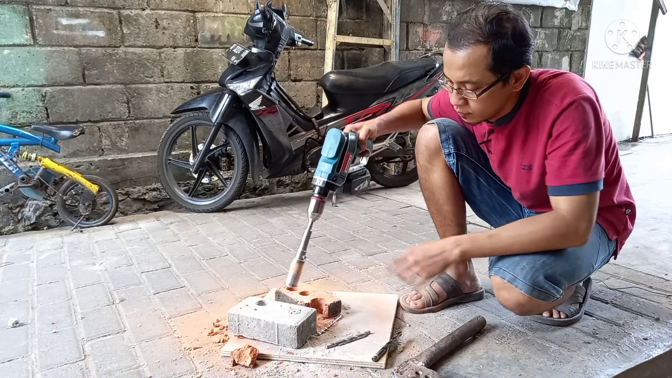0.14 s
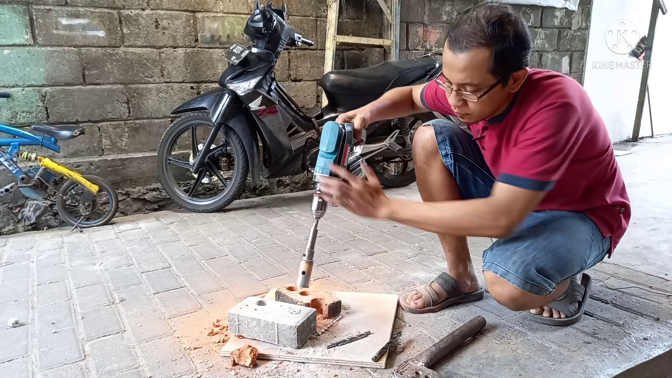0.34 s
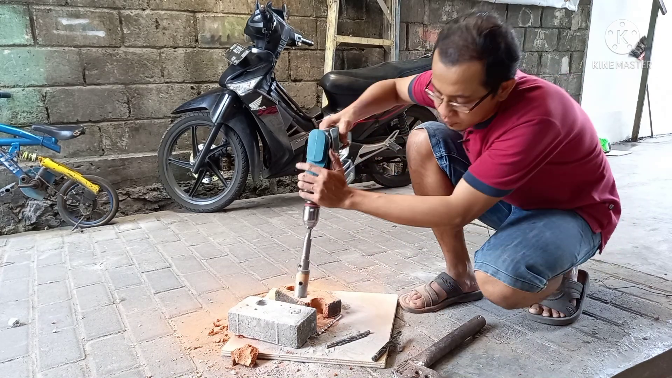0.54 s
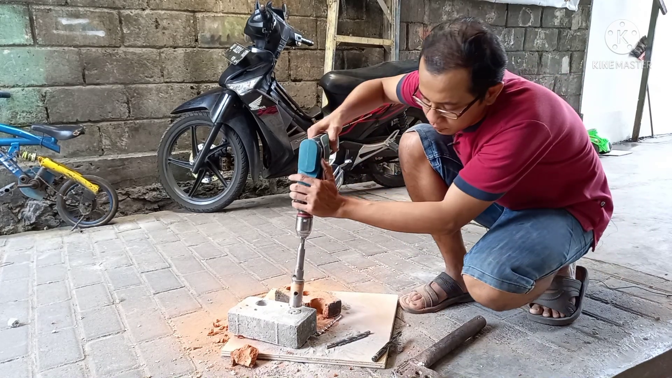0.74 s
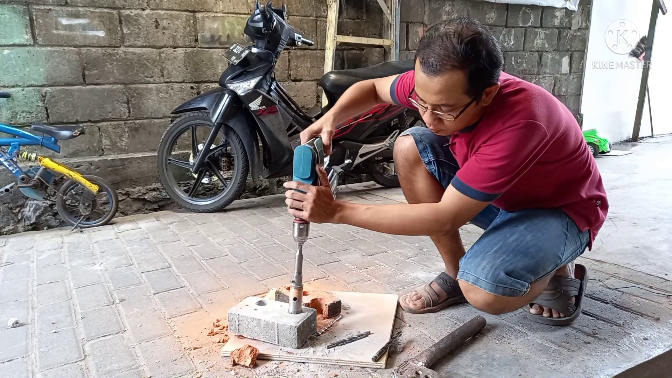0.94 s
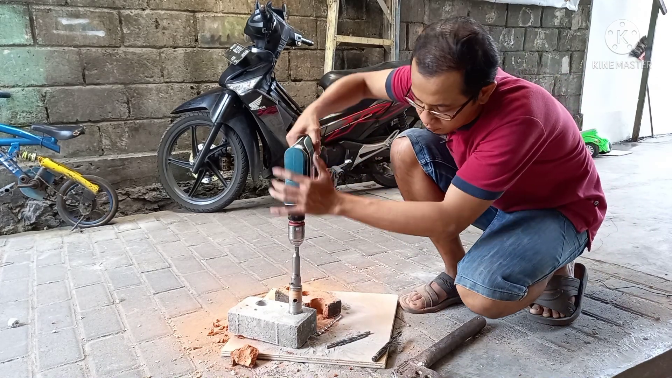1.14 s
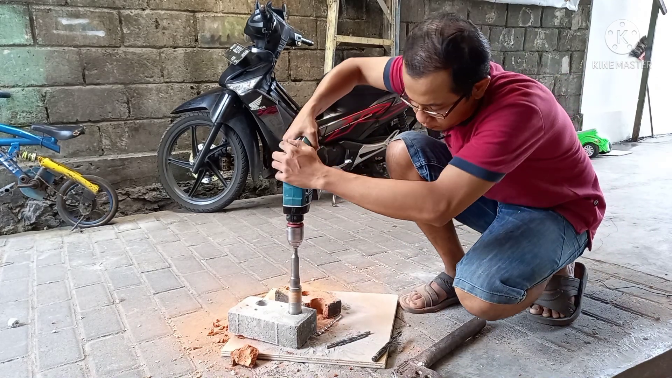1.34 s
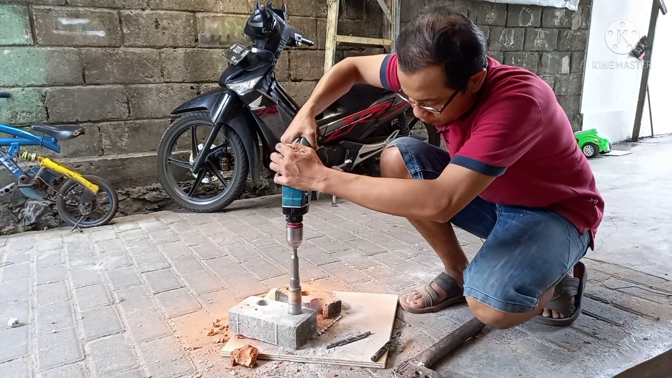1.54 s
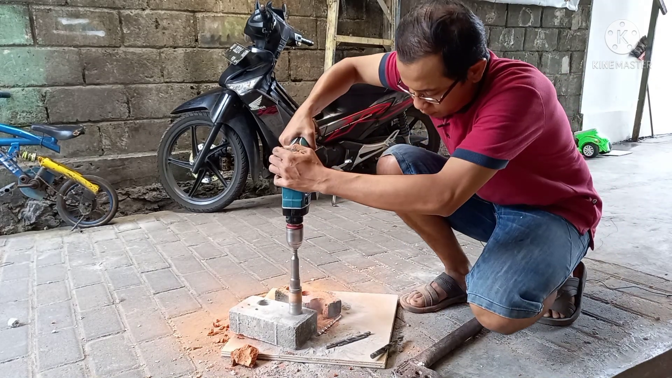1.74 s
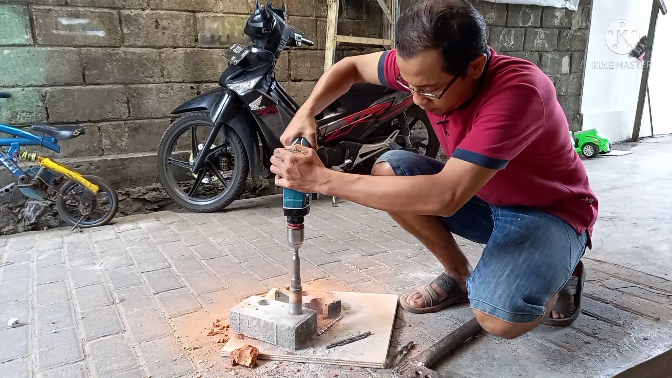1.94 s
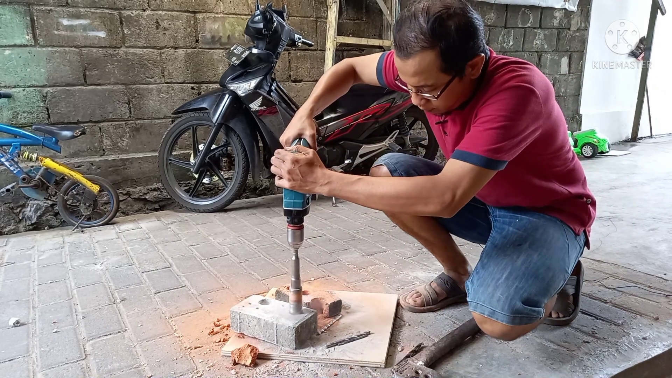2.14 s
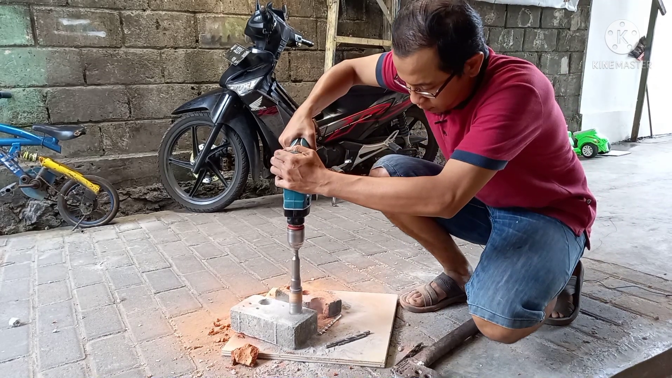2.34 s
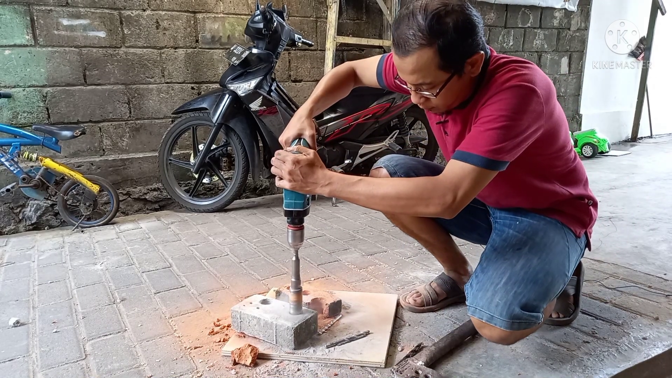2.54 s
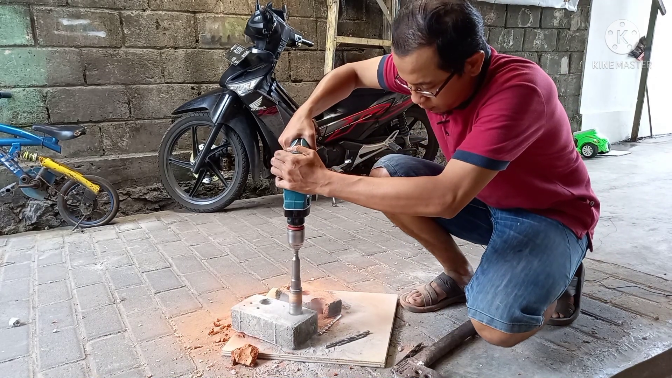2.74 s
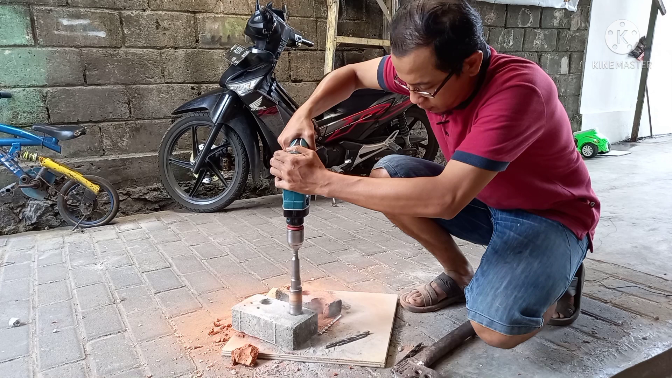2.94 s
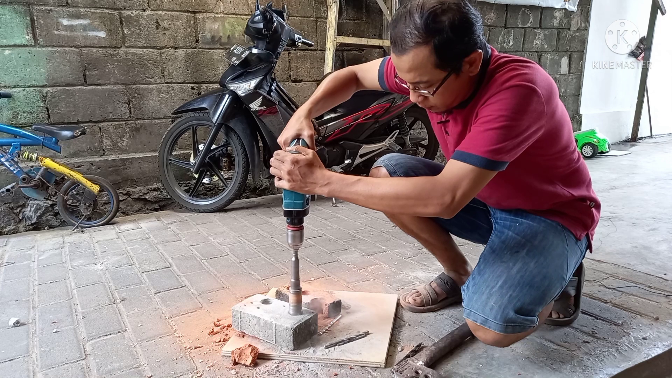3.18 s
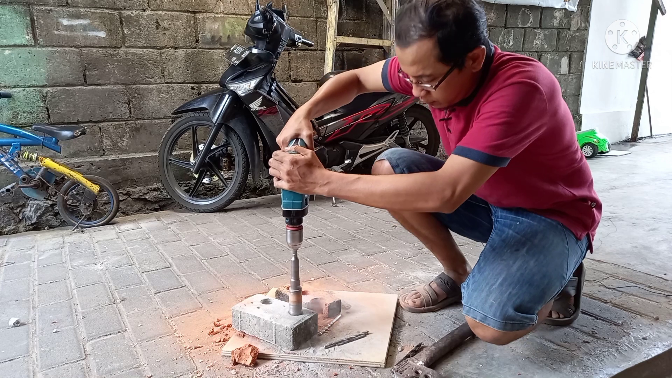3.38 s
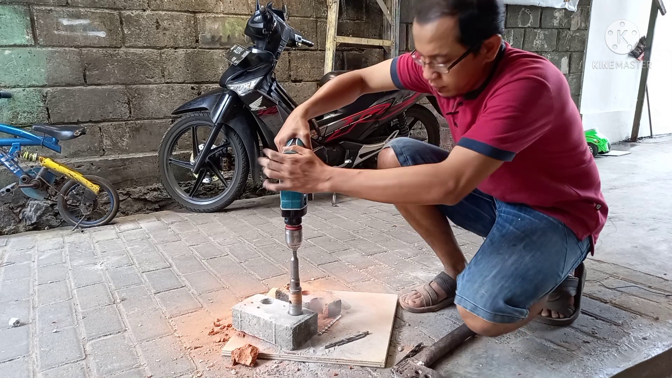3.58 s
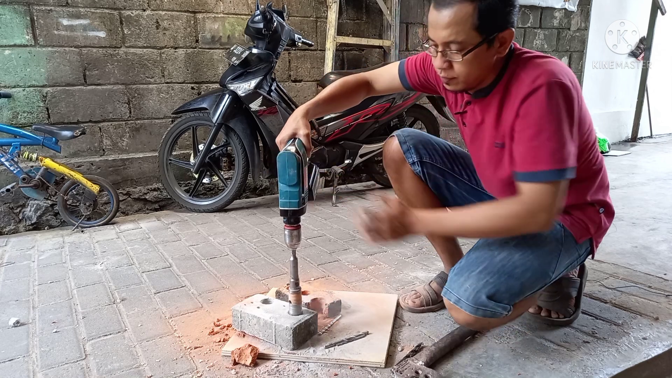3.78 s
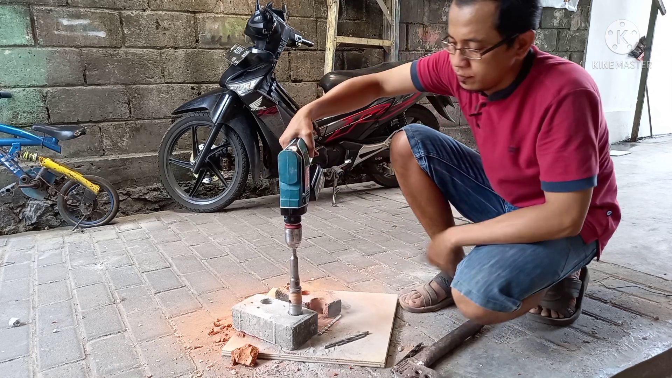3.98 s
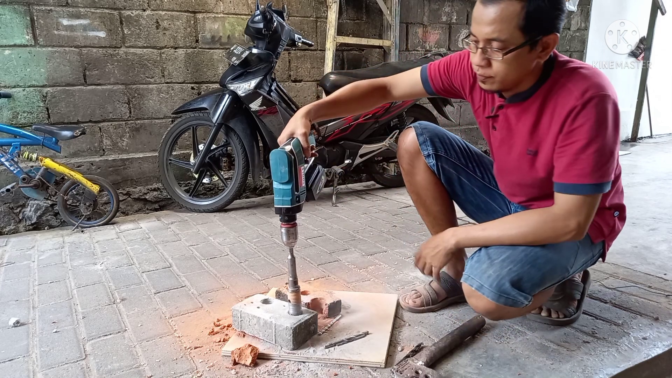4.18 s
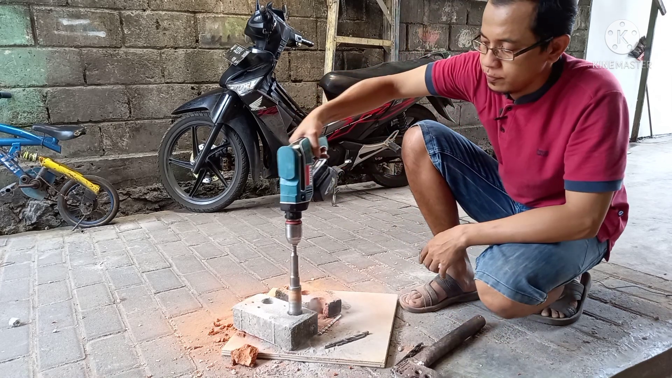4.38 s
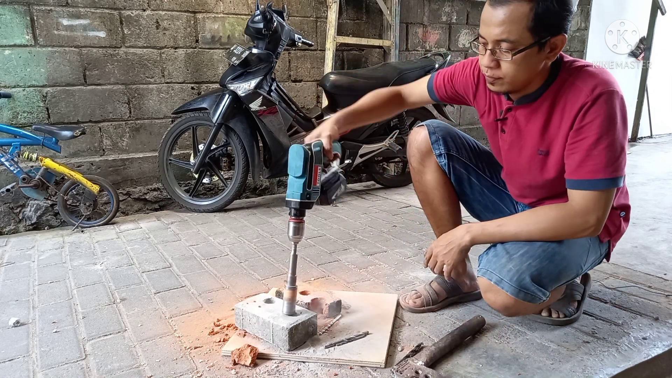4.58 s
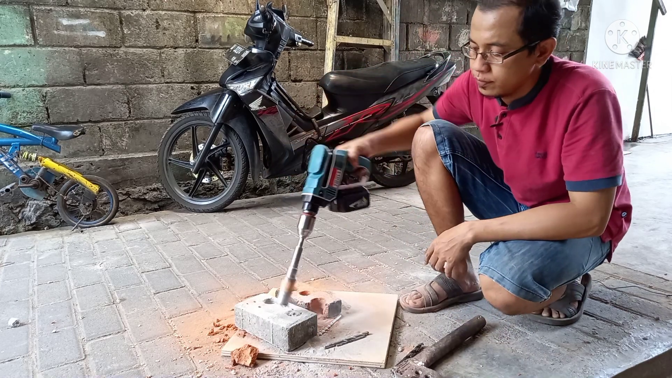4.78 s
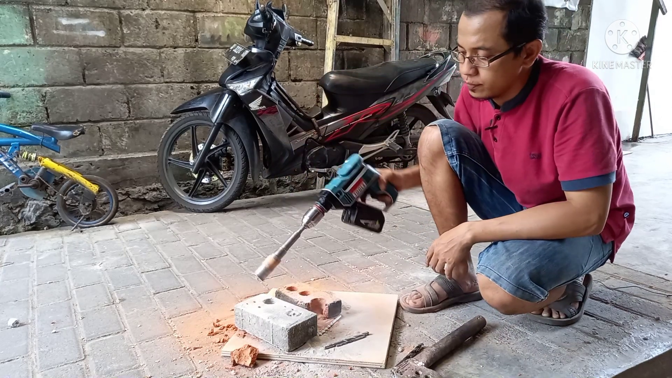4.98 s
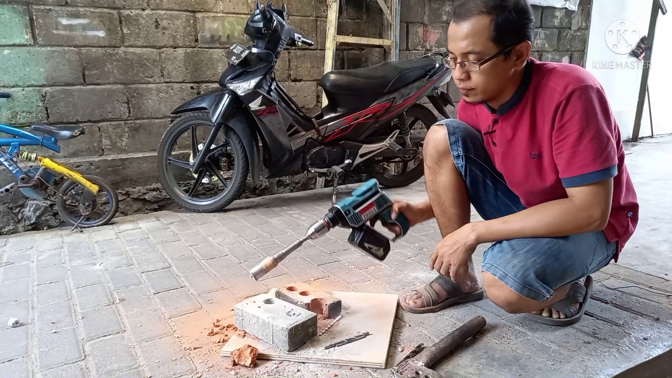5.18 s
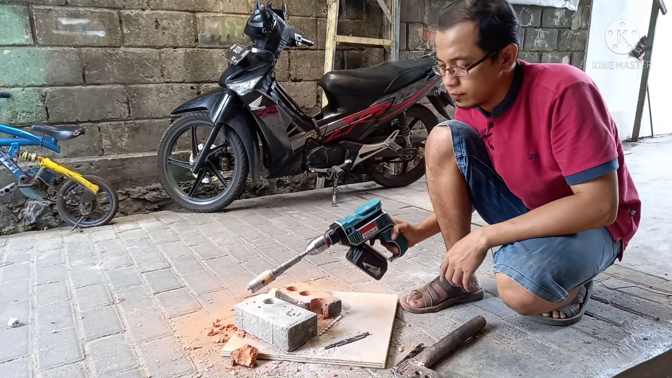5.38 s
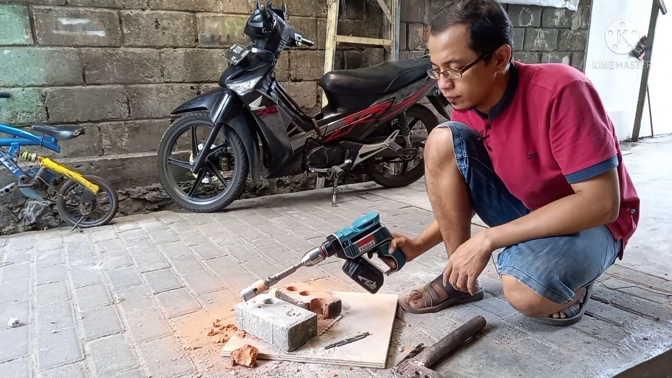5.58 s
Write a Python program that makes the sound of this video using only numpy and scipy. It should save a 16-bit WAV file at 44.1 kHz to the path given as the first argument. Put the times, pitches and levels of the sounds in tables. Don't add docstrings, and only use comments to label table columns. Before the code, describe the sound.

Close outdoor sound of a battery drill on concrete: a brief rattle and falling motor whir, quiet steel taps, hard clacks, then about two seconds of rough, rapid grinding with ringing steel and sharp squeaks at the start. The block's ring dies quickly, leaving near quiet. A short looser clatter then winds down with gear notes and airy hiss, over distant engine drone and light wall reflections.

```python
import sys
import numpy as np
from scipy import signal
from scipy.fft import rfft, irfft, next_fast_len
from scipy.io import wavfile
from scipy.ndimage import uniform_filter1d, map_coordinates

SR = 44100
rng = np.random.default_rng(int(sys.argv[2]) if len(sys.argv) > 2 else 0)


def int16_out(signal):
    q = np.round(np.clip(np.atleast_2d(signal).T, -1, 1) * 32767)
    wavfile.write(sys.argv[1], SR, q.astype(np.int16))


def volts_from_decibels(level):
    exponent = np.asarray(level, float) / 20
    return 10 ** exponent


N = 248106
TIME = np.arange(N) / SR


def unit(x):
    return x / np.sqrt(np.mean(x ** 2) + 1e-20)


def along(points, hz):
    f, v = np.transpose(points)
    return np.interp(np.log(hz + 1), np.log(f + 1), v, -120, -120)


def curves(rows, outside=None):
    s, *cols = np.transpose(rows)
    return [np.interp(TIME, s, c, outside, outside) for c in cols]


def wobble(rate_hz):
    coarse = np.arange(0, N + 8, 8)
    knots = rng.standard_normal(int(N * rate_hz / SR) + 4)
    smooth = map_coordinates(knots, [coarse * rate_hz / SR])
    return unit(np.interp(np.arange(N), coarse, smooth))


def filtered(x, response):
    m = next_fast_len(N + SR // 4)
    hz = np.fft.rfftfreq(m, 1 / SR)
    return unit(irfft(rfft(x, m) * response(hz), m)[:N])


def coloured(x, spectrum):
    return filtered(x, lambda hz: volts_from_decibels(along(spectrum, hz)))


def resonance(f, hz, width_hz):
    return 1j * f / (hz * hz - f * f + 1j * f * width_hz)


def ringing(x, modes):
    return sum(volts_from_decibels(db) * filtered(x, lambda f: resonance(f, hz, width)) for hz, width, db in modes)


def singing(x, hz, width_hz, db):
    return volts_from_decibels(db) * filtered(x, lambda f: resonance(f, hz, width_hz) ** 2)


def layers(spells, mix):
    force_db = np.max([curves(rows, outside=-120)[0] for rows in spells], axis=0)
    sharp_db = sum(curves(rows, outside=0)[1] for rows in spells)
    return [force_db] + [db + share * sharp_db for db, share in mix]


def grinding(chips, spectrum, edges_hz, levels_db):
    m = next_fast_len(N + SR // 4)
    hz = np.fft.rfftfreq(m, 1 / SR)
    steps = [1] + [1 / (1 + (edge / (hz + 1)) ** 16) for edge in edges_hz] + [0]
    whole = rfft(chips, m) * volts_from_decibels(along(spectrum, hz))
    thud, *upper = [unit(irfft(whole * (low - high), m)[:N]) for low, high in zip(steps, steps[1:])]
    return volts_from_decibels(levels_db[0]) * (thud + sum(volts_from_decibels(db) * part for db, part in zip(levels_db[1:], upper)))


def blips(rows, fall):
    out, u = np.zeros(N + SR), np.arange(-1200, 1200) / SR
    for (s, db, hz, ms), turn in zip(rows, rng.random(len(rows))):
        v = u / (ms / 1000)
        swell = volts_from_decibels(db) * np.exp(-2.8 * (v * np.where(v < 0, 1.7, .75)) ** 2)
        tone = np.cos(2 * np.pi * (hz * u * (1 - fall * v / 2) + turn))
        out[round(s * SR):][:len(u)] += swell * tone
    return out[len(u) // 2:][:N]


# time in seconds, firings per second.
ENGINE_FIRING = [(0, 43), (.5, 42.8), (1.2, 43), (5.63, 43)]
# multiple of the firing rate, level in dB re the drone.
ENGINE_HARMONICS = [(3, -5.5), (4, -10), (5, -14.5)]


def engine():
    phase = 2 * np.pi * np.cumsum(curves(ENGINE_FIRING)[0]) / SR
    hum_hz, hum_db = 150.4, -3
    total = volts_from_decibels(hum_db + 2.5 * wobble(6)) * np.sin(2 * np.pi * hum_hz * TIME + .5 * wobble(8))
    for k, db in ENGINE_HARMONICS:
        total = total + volts_from_decibels(db + 4 * wobble(7)) * np.sin(round(k) * phase + .5 * wobble(8))
    return total


# time in seconds, level in dB.
DRONE_LEVEL = [(0.0, -42), (0.1, -40), (0.27, -45), (0.77, -39), (1.49, -54), (1.71, -39.5), (1.91, -39),
               (2.73, -44), (3.51, -45), (3.89, -47), (4.07, -55.5), (4.54, -54.5), (4.78, -47),
               (5.12, -48.5), (5.63, -42)]
# time in seconds, level in dB.
WASH_LEVEL = [(0, -46.5), (.7, -52.5), (1.5, -53), (4, -63.5), (4.5, -66.5), (5, -66), (5.63, -48)]
# frequency in Hz, density in dB per Hz.
DRONE_COLOUR = [(90, -29), (122, -0.5), (143, -2), (165, 2), (210, -19), (260, -17), (320, -56)]
RUMBLE_COLOUR = [(20, -40.5), (45, -18), (72, -8.5), (100, -6.5), (130, -40.5)]
WASH_COLOUR = [(160, -18), (200, -0.5), (260, -1), (400, -8.5), (700, -14.5), (1100, -17), (1500, -33),
               (2000, -30.5), (2700, -35), (3100, -29), (3500, -36), (9000, -41), (15500, -63)]


def traffic():
    drone_db, = curves(DRONE_LEVEL)
    rumble_db = -53 + 0.98 * (drone_db - drone_db.mean())
    noise = rng.standard_normal((3, N))
    throb = volts_from_decibels(drone_db + 0.96 * wobble(12))
    drone = throb * (volts_from_decibels(-5) * coloured(noise[0], DRONE_COLOUR) + engine())
    rumble = volts_from_decibels(rumble_db) * coloured(noise[1], RUMBLE_COLOUR)
    wash = volts_from_decibels(curves(WASH_LEVEL)[0] + 1.5 * wobble(35)) * coloured(noise[2], WASH_COLOUR)
    return drone + rumble + wash


# frequency in Hz, t60 in seconds.
YARD_DECAY = [(200, .45), (2000, .4), (9000, .33), (15000, .15)]


def yard(x):
    hz, t, z = signal.stft(rng.standard_normal(SR // 2), SR, nperseg=256)
    t60 = np.interp(hz, *np.transpose(YARD_DECAY))
    tail = signal.istft(z * volts_from_decibels(-60 * t / t60[:, None]), SR, nperseg=256)[1]
    late = np.pad(x, (300, 0))
    return signal.fftconvolve(late, tail / np.linalg.norm(tail))[:N]


# time in seconds, peak in dB, thud in dB re the peak, click centre in Hz.
TAPS = [(0.014, -22, -0.5, 4540), (0.0484, -13.5, 12.5, 4880), (0.0776, -14.5, 5.5, 5460),
        (0.1384, -31, 8, 2495), (0.4316, -41.5, 8.5, 1500), (0.532, -51.5, 11, 1200),
        (0.5926, -46.5, -1, 2000), (0.7434, -50, -2.5, 5000), (1.154, -49.5, 18.5, 6980),
        (1.1722, -46.5, 17.5, 2000), (1.2064, -32, 23, 4390), (1.2251, -37, 15, 2990),
        (1.267, -28.5, -1.5, 1585), (1.2679, -34.5, -7, 2678), (1.271, -51.5, 4.5, 6520),
        (1.3443, -48.5, 7, 5030), (1.364, -46, 4, 2500), (1.4573, -52, 26, 5450), (1.557, -43.5, 8.5, 4000),
        (1.5901, -30, -2.5, 3000), (1.6057, -17.5, -2, 2580), (1.6281, -13, -2, 1800),
        (1.681, -11, 11, 2103), (1.9948, -4.5, -4.5, 2600), (2.0486, -16.5, -1, 3500),
        (4.1517, -52.5, 4.5, 2490), (4.1854, -54, -1, 4490), (4.586, -34, 12, 1496),
        (4.669, -15, -6.5, 4070), (4.6902, -11, -1.5, 3970), (4.822, -25, 2.5, 4500),
        (4.9048, -24.5, 9, 2000)]


def taps():
    out, t = np.zeros(N + SR), np.arange(4096) / SR
    f = np.fft.rfftfreq(len(t), 1 / SR) + 1
    for s, db, thud_db, hz in TAPS:
        noise = rfft(rng.standard_normal((2, len(t))))
        click = unit(irfft(noise[0] * volts_from_decibels(-9 * np.log2(f / hz) ** 2) / (1 + (f / 9000) ** 8)))
        click = click * volts_from_decibels(db - 8) * (volts_from_decibels(-60 * t / .013) + volts_from_decibels(-20 - 60 * t / .12))
        thud_hz = 540 * volts_from_decibels(0.12 * (db + thud_db + 9.5))
        thud = unit(irfft(noise[1] * volts_from_decibels(-7 * np.log2(f / thud_hz) ** 4)))
        thud = thud * volts_from_decibels(db + thud_db - 13.5 - 40 * (t / 0.038) ** 2)
        out[round(s * SR):][:len(t)] += click * (1 - np.exp(-t / .0005)) + thud * (1 - np.exp(-t / .005))
    return out[:N]


# time in seconds, level in dB, frequency in Hz, length in ms.
CHIRPS = [(1.157, -72, 6170, 15), (1.575, -63, 6040, 18), (1.595, -57.5, 6300, 18), (1.59, -67.5, 8990, 46),
          (4.553, -64, 6000, 15), (4.572, -67, 6350, 20), (4.555, -67.5, 8900, 15.4),
          (4.562, -72, 10600, 18), (4.606, -28.5, 5500, 4.5), (2.4, -52, 3700, 30), (1.583, -55, 1800, 8)]


def chirps():
    return blips(CHIRPS, fall=-.01) * volts_from_decibels(4 * wobble(350) + 1.5)


def fan_top(bins, frames, start_s, top_hz, fall_hz_per_s):
    lowest_hz, edge_db_per_khz, crest_db = 9700, 3.5, 0
    edge = np.maximum(top_hz - fall_hz_per_s * (frames * 256 / SR - start_s), lowest_hz)
    over_khz = (bins * SR / 512 - edge) / 1000
    crest = crest_db * np.exp(-(over_khz + 1) ** 2) * (edge > lowest_hz)
    return crest - edge_db_per_khz * np.clip(over_khz, 0, 5)


# time in seconds, rattle in dB, sharpness in dB.
COAST = [
    [(0.14, -42.5, 5.5), (0.25, -42.5, 4), (0.5, -51, -4), (0.57, -53, -14), (0.7, -66, -40)],
    [(4.9, -36.5, -9), (4.97, -41, 5.5), (5.08, -39.5, 6.5), (5.3, -41, 4.5), (5.45, -42.5, 1),
     (5.63, -47, 1.5)],
    [(1.15, -64.5, 2), (1.16, -56.5, -15), (1.24, -56, -15), (1.4, -67.5, -12)],
]
# frequency in Hz, density in dB per Hz.
WHIR = [
    [(300, -14), (530, -16), (950, 0), (1500, -14), (3300, -22), (3550, -18), (3900, -23), (5400, -20),
     (5790, -10), (6250, -17.5), (9600, -31.5), (12300, -53), (15500, -47)],
    [(250, -14.5), (550, -11), (640, -2.5), (1130, -2.5), (1280, -5), (1450, -6.5), (2500, -14),
     (3200, -13), (3600, -7), (5700, -9), (9250, -23.5), (10300, -42.5), (15500, -45)],
    [(300, 0.5), (1400, -10.5), (2000, 6), (2600, -11), (3200, -1.5), (4200, -20), (5600, -5), (9000, -22)],
]
# start in seconds, top then in Hz, fall in Hz per second.
FAN_TOP = [
    (.15, 13700, 20000),
    (4.2, 15100, 8900),
    (1.15, 9000, 1100),
]
# level in dB re the thud, share of the sharpness followed.
COAST_MIX = [(-10, .1), (-9.5, 0.54), (-30.5, 1.5)]


def coasting():
    total = 0
    for rows, spectrum, top in zip(COAST, WHIR, FAN_TOP):
        z = signal.stft(rng.standard_normal(N), nperseg=512)[2]
        bins, frames = np.indices(z.shape)
        knots = rng.standard_normal((300, 60))
        bands = map_coordinates(knots, [bins * (1 + frames / 900) / 2.7, frames / 18], mode="wrap")
        gain_db = 2.8 * bands + fan_top(bins, frames, *top)
        hiss = signal.istft(z * volts_from_decibels(gain_db), nperseg=512)[1][:N]
        hiss = hiss * volts_from_decibels(1.3 * wobble(90) + 1.6 * wobble(250))
        total = total + grinding(hiss, spectrum, [1600, 3000, 9900], layers([rows], COAST_MIX))
    return total


# frequency in Hz, width in Hz, start in seconds, end in seconds, level in dB.
CLATTER = [(946, 120, .15, 0.566, -52), (5760, 130, .17, .6, -58.5), (3490, 150, .19, 0.37, -67),
           (3000, 150, 1.28, 1.34, -64.5), (1271, 55, 4.93, 5.06, -41), (1307, 40, 5.072, 5.13, -34),
           (1250, 50, 5.15, 5.2, -43), (1240, 50, 5.22, 5.31, -42.5), (5190, 70, 4.9, 5.5, -59),
           (5090, 60, 5.03, 5.3, -55), (3560, 260, 5.09, 5.63, -50.5), (5800, 54, 4.95, 5.3, -52),
           (1390, 150, 5.9, 5.47, -48), (1340, 180, 5.54, 5.6, -48), (1930, 60, 4.93, 5.1, -50.5),
           (390, 15, 4.95, 5.2, -52), (9300, 200, 5.25, 5.7, -68), (8260, 150, 5.08, 5.28, -60),
           (11800, 150, .14, .19, -61), (15000, 500, .2, .42, -75)]


def clatter():
    lumps = volts_from_decibels(2.5 * wobble(35) + 1.8 * wobble(200)) * rng.standard_normal(N)
    fade_db_per_s = 12.5
    total = 0
    for hz, width_hz, start, end, db in CLATTER:
        gate = np.clip(np.minimum((TIME - start) / .006, (end - TIME) / (.25 * (end - start))), 0, 1)
        fade = volts_from_decibels(-fade_db_per_s * np.clip(TIME - start, 0, 1))
        total = total + gate * fade * singing(lumps, hz, 1.5 * width_hz, db)
    return total


# frequency in Hz, level in dB, t60 in seconds.
AFTER_MODES = [(635, 0.5, .22), (885, -2, .25), (1497, -11, 0.32), (2200, -13, 0.26), (3060, -11, 0.32),
               (3345, -13, 0.26), (4011, -15, 0.34), (5249, -20, .17), (8839, -11, 0.323),
               (9189, -11.5, 0.23)]


def after_ring():
    stop_s, level_db, width_hz = 3.92, -48, 110
    since = TIME - stop_s
    noise = np.clip(since / .04 + 1.9, 0, 1) * rng.standard_normal(N)
    total = 0
    for hz, db, t60 in AFTER_MODES:
        decay = volts_from_decibels(-60 * np.clip(since, -.03, 2) / t60)
        total = total + decay * singing(noise, hz, width_hz, db + level_db)
    return total


# frequency in Hz, width in Hz, relative level in dB.
SHANK = [(10632, 14, 0), (10702, 12, 0), (11725, 60, -15), (12845, 90, -10)]


def shank(chips):
    return ringing(chips, SHANK)


def fractures(rate_hz, spread_db, soft_hz):
    sizes = volts_from_decibels(spread_db * np.clip(rng.standard_normal(N), -2, 2))
    pushes = -1. * (rng.random(N) < rate_hz / SR) * sizes
    return filtered(pushes, lambda hz: 1 / (1 + (hz / soft_hz) ** 2))


LOOSE_BLOWS_PER_S = 91
# time in seconds, force in dB, sharpness in dB.
LOOSE = [
    [(0, -27.5, 1), (0.055, -28.5, 0), (0.12, -36, 0.5), (0.16, -39.5, 3.5), (0.21, -48, 2)],
    [(4.55, -60.5, -10), (4.58, -53, -10), (4.61, -30.5, 0), (4.69, -21.5, 1.5), (4.722, -32, 6.5),
     (4.75, -22.5, -0.5), (4.875, -29.5, 3), (4.895, -33.5, -2), (4.97, -47.5, 7)],
]
# frequency in Hz, density in dB per Hz.
FREE_COLOUR = [(200, -8.5), (270, -2.5), (480, 0), (600, 0.5), (730, -14.5), (900, 4.5), (1200, -1),
               (2850, -18.5), (5000, -7.5), (7800, -18), (9900, -23.5), (15500, -37)]
# level in dB re the thud, share of the sharpness followed.
LOOSE_MIX = [(-7.5, 0.55), (-10, .6), (-29.5, 1.8)]


def loose():
    levels = layers(LOOSE, LOOSE_MIX)
    force_db = 2.7 * wobble(300) + 1.1 * wobble(60) - 6.2 * (LOOSE_BLOWS_PER_S * TIME % 1)
    chips = unit(volts_from_decibels(force_db) * rng.standard_normal(N))
    broken = chips + .22 * fractures(220, 3.5, 2600)
    rings = volts_from_decibels(-29) * shank(chips) + ringing(chips, [(9050, 84, -32)])
    return grinding(broken, FREE_COLOUR, [1500, 3200, 9800], levels) + volts_from_decibels(levels[0]) * rings


# time in seconds, turns made.
SPINDLE = [(1.4, -7), (1.7796, 0), (1.989, 4), (2.255, 9), (2.5339, 14), (2.8742, 20), (3.0952, 24),
           (3.441, 30), (3.7352, 35), (4.5, 48)]


def spindle():
    return uniform_filter1d(curves(SPINDLE)[0], SR // 8)


# first turn, last turn, angle in turns, peak in dB, frequency in Hz.
SPOTS = [(3, 5, 0, -18, 9480), (6, 20, 0, -23, 8900), (23, 31, 0, -24, 8660), (5, 8, -.085, -22.5, 8750),
         (14, 20, -.08, -22, 8720), (4, 11, -.25, -23, 8560), (13, 20, -.27, -24.5, 8420),
         (21, 23, -.23, -20, 8430), (25, 31, -.195, -24, 8560), (34, 35, .2, -23.5, 8850),
         (34, 36, .01, -25, 8710)]
# time in seconds, peak in dB, frequency in Hz.
SQUEAKS = [(0.052, -27.5, 9710), (0.0837, -39, 9100), (1.6364, -19.5, 8770), (1.6416, -16, 8960),
           (1.649, -11.5, 8600), (1.6824, -24, 8650), (1.7196, -24, 8320), (3.5335, -26.5, 8870),
           (3.8875, -27, 8960), (3.892, -26, 8850), (4.5925, -24.5, 8710), (4.6408, -29.5, 8980),
           (4.6559, -23, 8840), (4.704, -24, 9200), (4.7523, -18, 9170), (4.7644, -24, 8980)]
# time in seconds, peak in dB, frequency in Hz.
FIRST_SLIPS = [(1.7173, -18.5, 8070), (1.7248, -21, 9370), (1.7248, -11, 8890), (1.7428, -10.5, 9000),
               (1.7428, -7, 8600), (1.7763, -12, 8910), (1.7767, -12.5, 8900), (1.7957, -11, 8660),
               (1.8286, -22.5, 8360), (1.8286, -13.5, 8990), (1.8433, -13, 8780), (1.848, -11.5, 8650),
               (1.8815, -24, 9340), (1.882, -13.5, 8900), (1.8969, -11, 8780), (1.9348, -13, 9520)]


def slips():
    rows = []
    for first, last, angle, db, hz in SPOTS:
        rows += [(turn + angle, db, hz) for turn in range(round(first), round(last) + 1)]
    rows = np.array(rows)
    rows = rows + rng.standard_normal(rows.shape) * [.014, 2.2, 170]
    s, turns = np.transpose(SPINDLE)
    at_s = np.interp(rows[:, 0], turns, s)
    return np.vstack([SQUEAKS, FIRST_SLIPS, np.column_stack([at_s, rows[:, 1:]])])


# frequency in Hz, density in dB per Hz.
SCRAPE_COLOUR = [(3000, -19.5), (4500, -7), (7000, -4), (11000, -8.5), (15500, -9)]


def squeaks():
    s, db, hz = slips().T
    draw = rng.random((len(s), 6))
    ms = np.clip(2.5 + 0.028 * (db + 13) + 1.3 * (draw[:, 0] - .5), .6, 4)
    main = np.transpose([s, db, hz, ms])
    side_s, side_hz = s + 0.0064 * (draw[:, 4] - .1), hz * (.95 + .09 * draw[:, 5])
    side = np.transpose([side_s, db - 6, side_hz, .62 * ms])
    chatter_s, chatter_hz = s - .004 + .014 * draw[:, 1], hz * (.96 + 0.08 * draw[:, 3])
    chatter = np.transpose([chatter_s, db - 12 - 6 * draw[:, 2], chatter_hz, 1.1 * ms])
    tones = blips(np.vstack([main, side, chatter]), fall=.025)
    rubbing = uniform_filter1d(uniform_filter1d(np.abs(tones), 350), 350)
    hiss = coloured(rng.standard_normal(N), [(7600, -25), (8300, 4), (9300, 6), (10000, -33.5)])
    rasp = uniform_filter1d(np.abs(tones), 60) * coloured(rng.standard_normal(N), SCRAPE_COLOUR)
    return tones + volts_from_decibels(-3.5) * rubbing * hiss + volts_from_decibels(-18.5) * rasp


BLOWS_PER_TURN, BLOW_ANGLE = 4, .35


def blows():
    rows = []
    loaded_count = BLOWS_PER_TURN * spindle() + BLOW_ANGLE
    loose_count = LOOSE_BLOWS_PER_S * TIME
    for count, spells, level_db in [(loaded_count, [PRESSED], 2), (loose_count, LOOSE, -4.5)]:
        at = np.flatnonzero(np.diff(np.floor(count)))
        draw = rng.standard_normal((600, 2))[:len(at)]
        db = layers(spells, [])[0][at] + level_db + 2.5 * draw[:, 0]
        s = np.abs(at / SR + .001 * draw[:, 1])
        rows += [row for row in zip(s, db, rng.random(600)) if row[1] > -70]
    return rows


# time in seconds, peak in dB.
BITES = [(1.5919, -18), (1.6141, -11), (1.6425, -10.5), (1.6592, -1), (1.6685, -4), (1.684, -14.5),
         (1.7433, -4.5), (3.8199, -8)]
# time in seconds, heard peak in dB.
LOADED_BITES = [(1.6981, 0.5), (1.7071, -4), (1.7159, -4.5), (1.7259, -3), (1.7512, -6), (1.763, -2),
                (1.7753, 1), (1.7945, -3.5), (1.806, -2.5), (1.8274, -3), (1.8419, -3), (1.8521, 0.5),
                (1.8681, -2.5), (1.8843, -3), (1.9003, -6), (1.9217, -7.5), (1.9535, 0.5), (1.9727, -9),
                (1.9951, -5.5), (2.0088, -3), (2.0485, -5), (2.0697, -5.5), (2.1015, -9), (2.1135, 0.5),
                (2.1672, -0.5), (2.2088, -3.5), (2.2202, -3.5), (2.2736, -4), (2.284, -4.5), (2.3072, -1.5),
                (2.3283, -3), (2.3835, -8.5), (2.3996, -10), (2.4518, -10.5), (2.4857, -3.5),
                (2.5042, -2.5), (2.5812, -2.5), (2.652, -2.5), (2.6747, -3), (2.7094, -1.5), (2.7272, -2.5),
                (2.8921, -4.5), (2.9756, -5), (3.0058, -4.5), (3.2766, 0), (3.349, -2), (3.3749, -6),
                (3.407, -3), (3.4673, -4.5), (3.493, -4), (3.5094, -4), (3.5258, -3.5), (3.5812, -1.5),
                (3.6268, -2), (3.6407, -4.5), (3.7342, -4.5), (3.7488, -6), (3.762, -4)]
LOOSE_BITES = [(0.008, -17), (0.0178, -24), (0.0245, -18), (0.0342, -13), (0.0412, -24), (0.0534, -14.5),
               (0.0613, -31), (0.0721, -19), (0.0803, -16), (0.0892, -19), (0.1008, -19), (0.1407, -21.5),
               (4.6243, -17), (4.6411, -12), (4.6465, -11), (4.6555, -14), (4.6608, -17), (4.6724, -9),
               (4.6816, -12), (4.6915, -4.5), (4.6989, -14), (4.7047, -11), (4.7204, -20), (4.7281, -22),
               (4.74, -18), (4.749, -6.5), (4.755, -21), (4.7652, -12), (4.7715, -14), (4.7798, -25),
               (4.792, -13), (4.7979, -17), (4.804, -12), (4.809, -17), (4.8158, -15), (4.8246, -15),
               (4.838, -17), (4.8605, -21), (4.8706, -16), (4.8796, -13.5), (4.8847, -14), (4.9082, -20)]


def bites():
    out, t = np.zeros(N + SR), np.arange(-300, 500) / SR
    push_db = 3
    rows = BITES + [(s, db + push_db) for s, db in LOADED_BITES + LOOSE_BITES]
    big = [(s, db, pitch) for (s, db), pitch in zip(rows, rng.random(len(rows)))]
    for s, db, pitch in big + blows():
        swing = np.exp(-np.abs(t) / np.where(t < 0, .0009, .0016))
        thump = -np.cos(2 * np.pi * (640 + 300 * pitch) * t) * swing
        crack = (t > -.0004) * volts_from_decibels(-7.5 - 60 * t / 0.0076) * rng.standard_normal(len(t))
        out[round(s * SR):][:len(t)] += volts_from_decibels(db - 4.5) * (thump + crack)
    band = signal.butter(5, [260, 3700], "bandpass", fs=SR, output="sos")
    return signal.sosfiltfilt(band, out[300:][:N])


# time in seconds, force in dB, sharpness in dB.
PRESSED = [(1.585, -56, 11.5), (1.62, -27.5, -12), (1.655, -24, -12), (1.69, -16, 0), (1.75, -14.5, 7.5),
           (2.1, -16.5, 1), (3.82, -16.5, 0.5), (3.88, -25.5, 3.5), (3.92, -38.5, 6), (3.95, -51.5, 15),
           (4.08, -69, 16)]
# level in dB re the thud, share of the sharpness followed.
PRESSED_MIX = [(-9, 0.26), (-21, 0.64), (-50.5, 1.2)]
# frequency in Hz, density in dB per Hz.
BLOCK_COLOUR = [(200, -12), (255, -18), (290, -0.5), (350, 2), (600, 6.5), (760, 0.5), (1000, 0),
                (1500, -13.5), (3300, -19.5), (3900, -31.5), (5000, -32), (8000, -29.5), (10500, -33),
                (15500, -40.5)]
# frequency in Hz, width in Hz, level in dB re the thud.
BODY = [(285.5, 27, -16.5), (630, 7.6, -11), (600, 75, -8.5), (2225, 160, -24), (3007, 33, -27),
        (8600, 480, -42.5), (9100, 67, -31.5)]
# multiple of the spindle, level in dB re the thud.
GEARS = [(16, -12), (33, -12), (48.1, -4.5)]


def pressed():
    s, db, sharp = PRESSED[-1]
    dying_s, dying_db_per_s = .4, 43.5
    murmur = (s + dying_s, db - dying_db_per_s * dying_s, sharp)
    levels = layers([PRESSED + [murmur]], PRESSED_MIX)
    turns = spindle()
    catch = uniform_filter1d(.5 - (turns - .11) % 1, SR // 200)
    since_blow = (BLOWS_PER_TURN * turns + BLOW_ANGLE) % 1
    uneven_db = 1.5 * wobble(420) + 1.1 * wobble(70) + .5 * wobble(8.2)
    force_db = 1.1 * catch - 4.1 * since_blow + uneven_db
    chips = unit(volts_from_decibels(force_db) * rng.standard_normal(N))
    broken = chips + .3 * fractures(300, 3.5, 2400)
    whine = 0
    for k, db in GEARS:
        whine = whine + np.sin(2 * np.pi * k * turns + .8 * wobble(40)) * volts_from_decibels(1.3 * wobble(30) + db)
    rings = ringing(chips, BODY) + volts_from_decibels(-39.5 + 3.3 * wobble(25)) * shank(chips) + whine
    return grinding(broken, BLOCK_COLOUR, [1300, 3800, 10000], levels) + volts_from_decibels(levels[0]) * rings


def scene():
    sharp = squeaks() + chirps() + bites() + taps()
    steady = pressed() + loose() + coasting() + clatter() + after_ring()
    echo = volts_from_decibels(-17.5) * yard(sharp + volts_from_decibels(-7) * steady)
    return (sharp + steady + echo + traffic())[None]


def low_pass(x):
    return signal.sosfilt(signal.butter(12, 16270, fs=SR, output="sos"), x)


def record(dry):
    held = dry / (1 + np.abs(dry / 1.04) ** 4) ** (1 / 4)
    hz = np.fft.rfftfreq(N, 1 / SR)
    mix = irfft(rfft(held) * ((hz > 36) & (hz < 15830)), N)
    return low_pass(mix)


dry = scene()
out = record(dry)
int16_out(out)
```